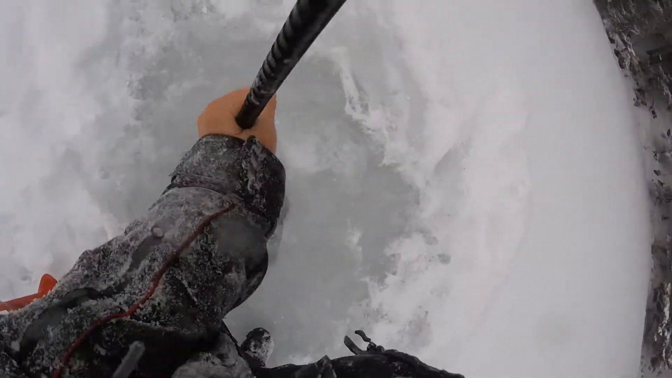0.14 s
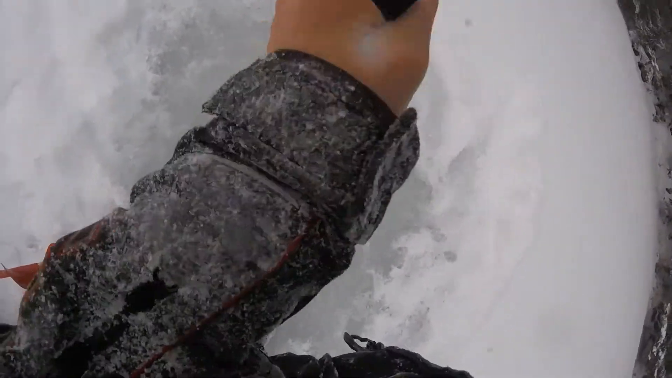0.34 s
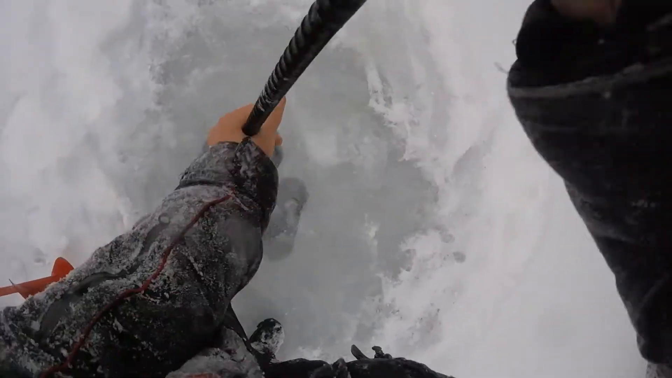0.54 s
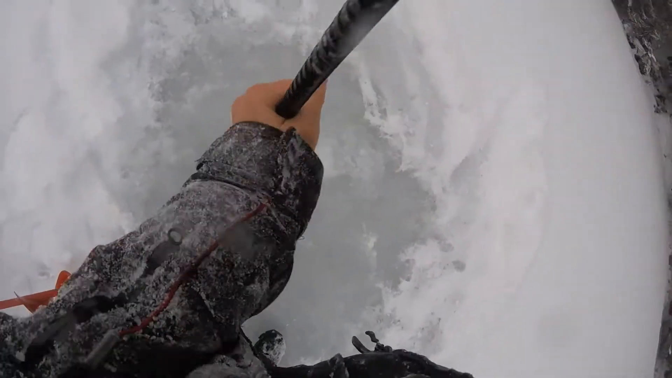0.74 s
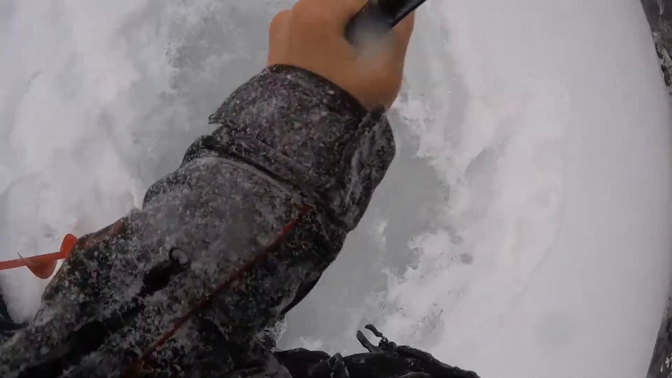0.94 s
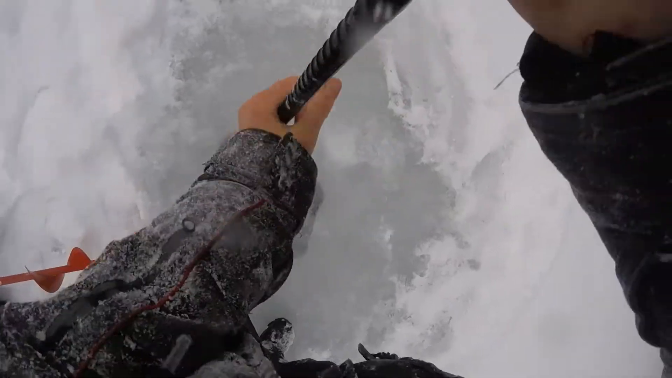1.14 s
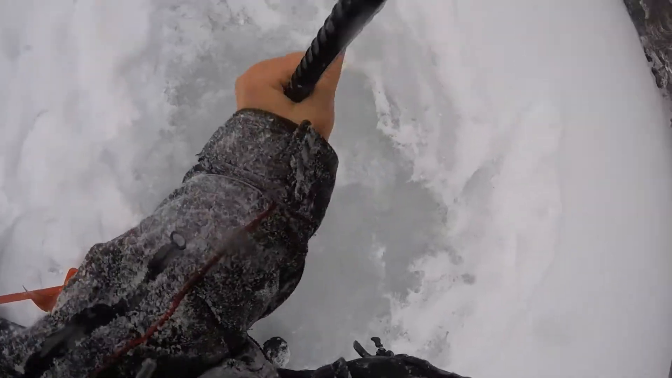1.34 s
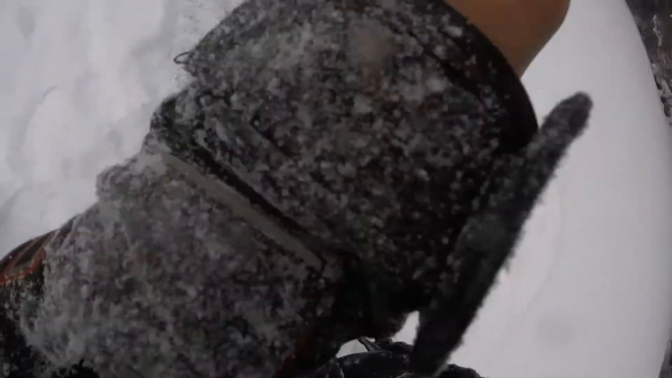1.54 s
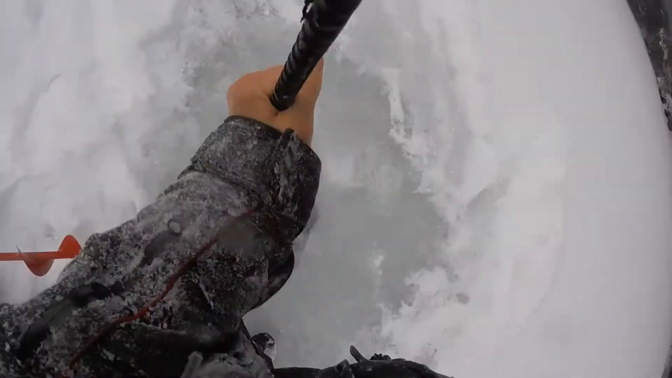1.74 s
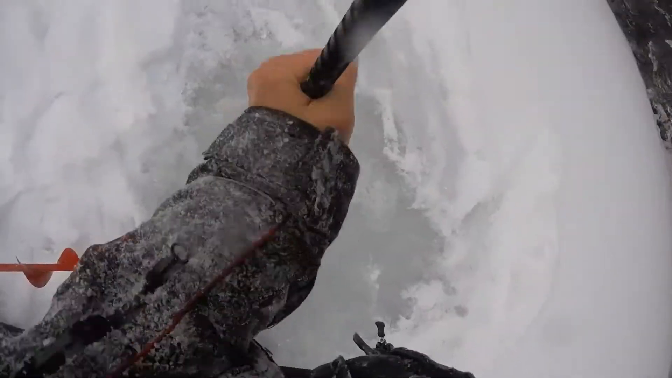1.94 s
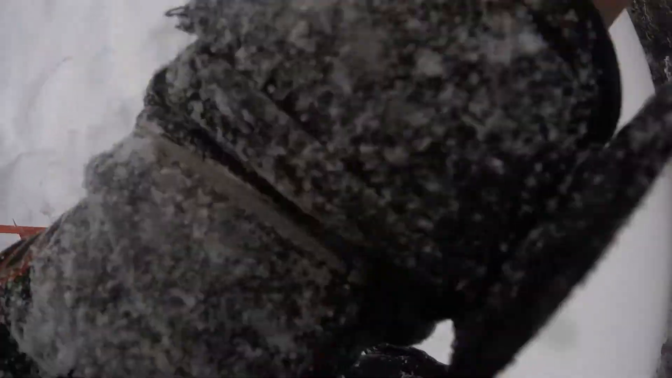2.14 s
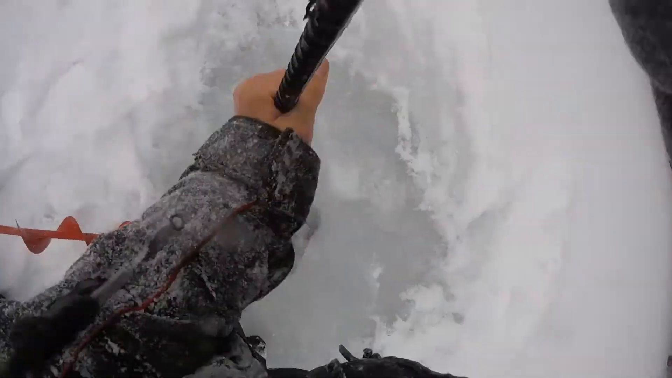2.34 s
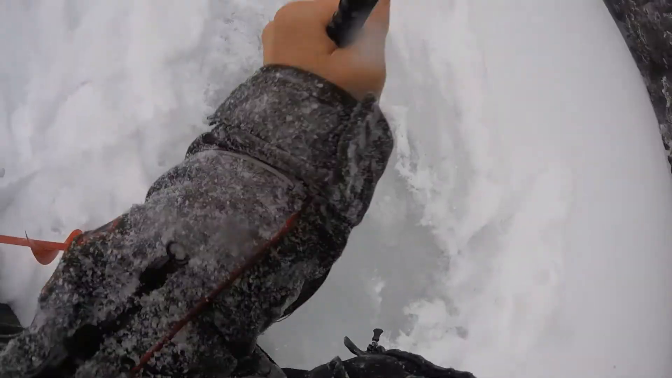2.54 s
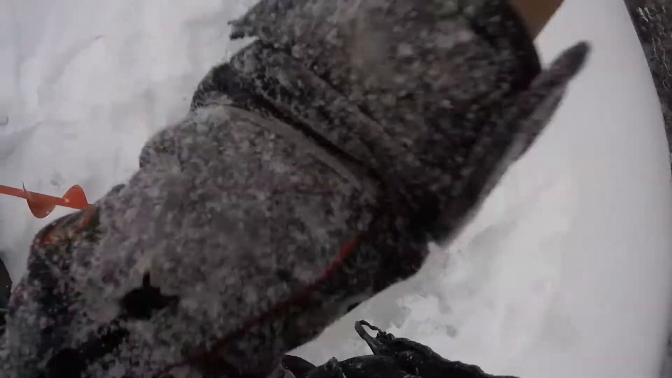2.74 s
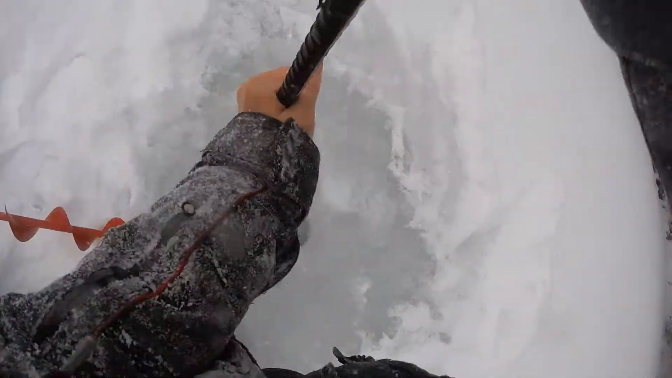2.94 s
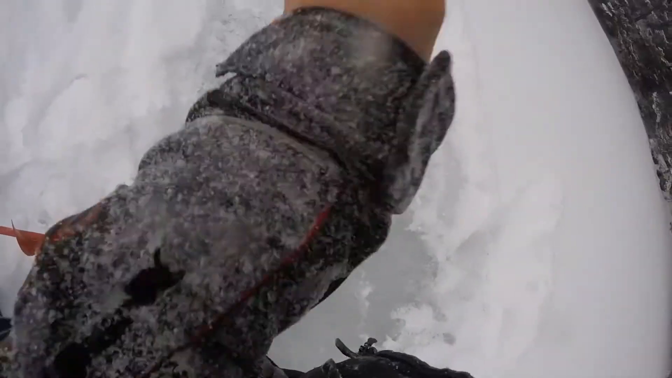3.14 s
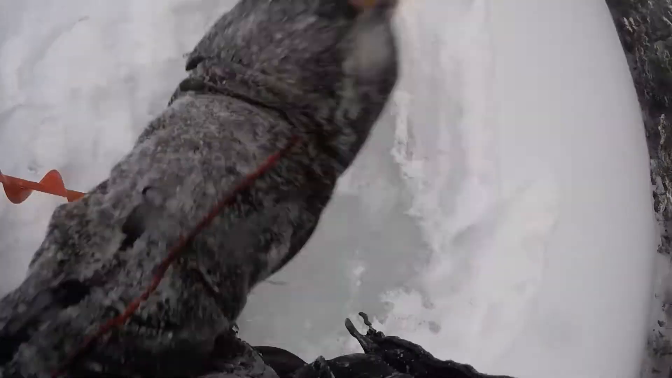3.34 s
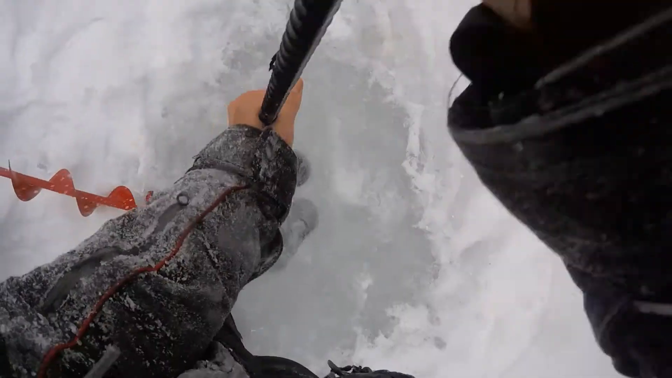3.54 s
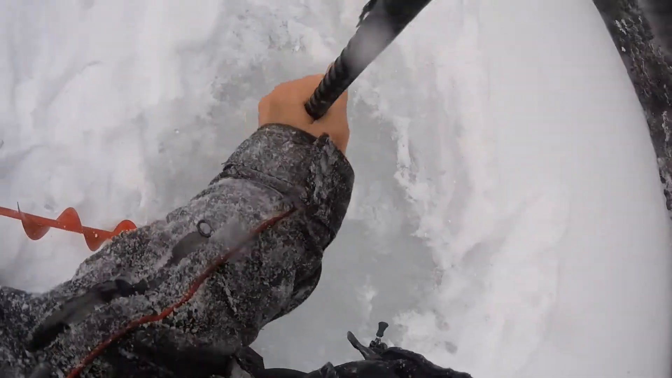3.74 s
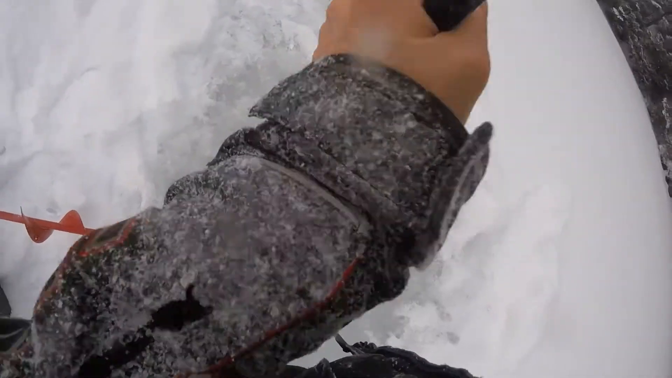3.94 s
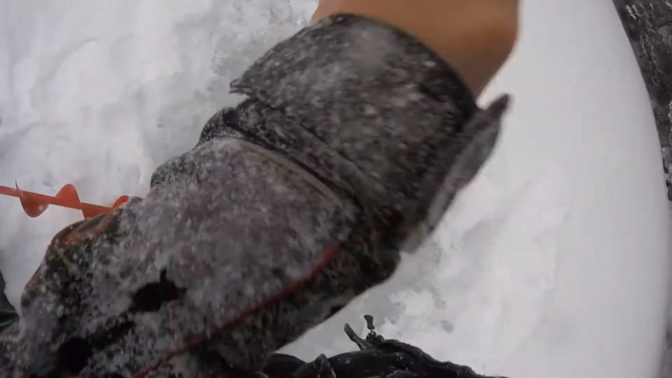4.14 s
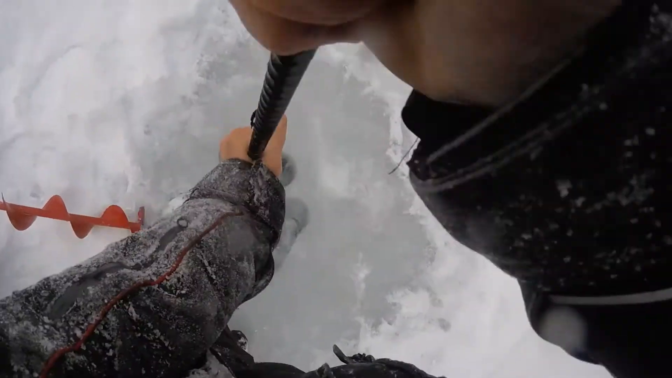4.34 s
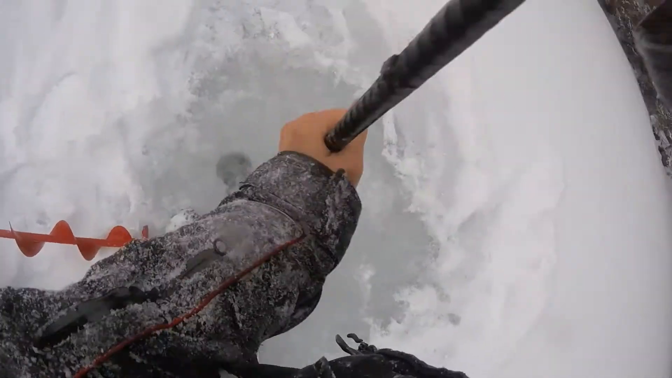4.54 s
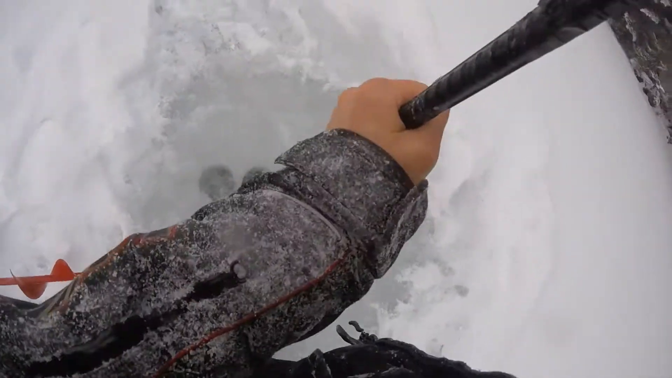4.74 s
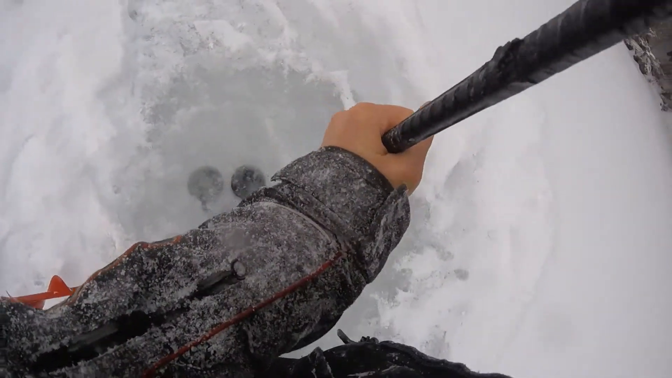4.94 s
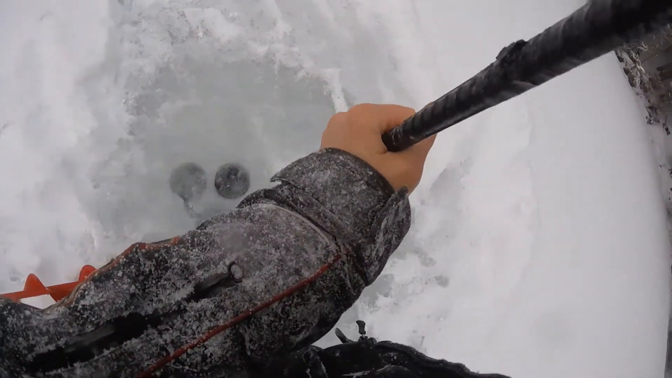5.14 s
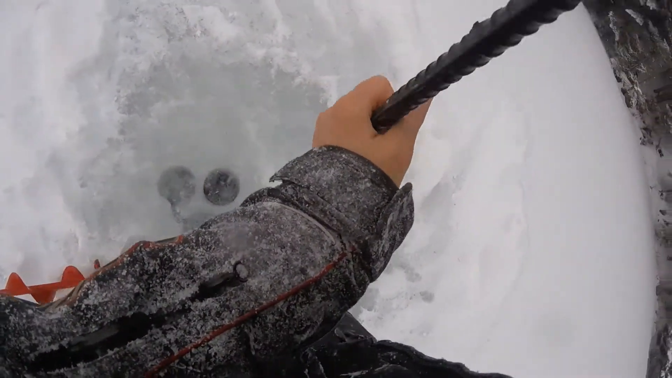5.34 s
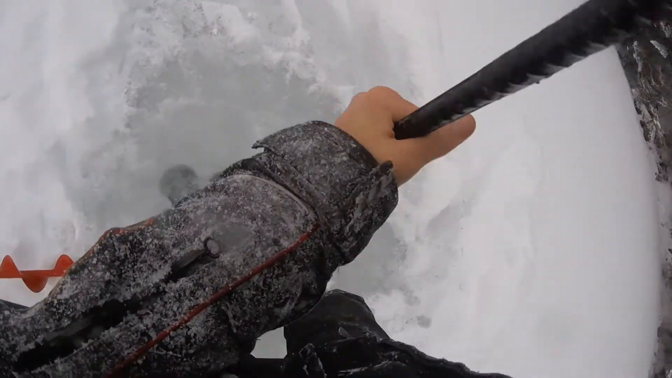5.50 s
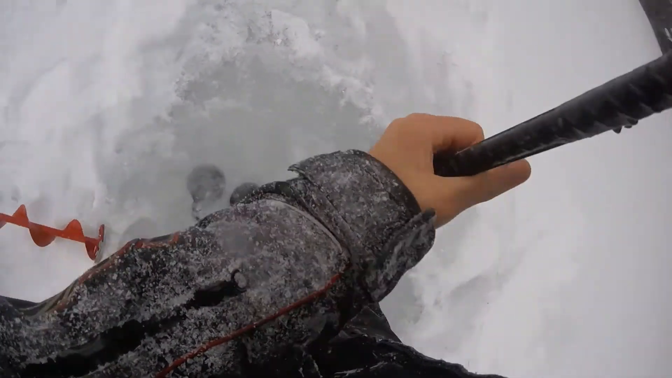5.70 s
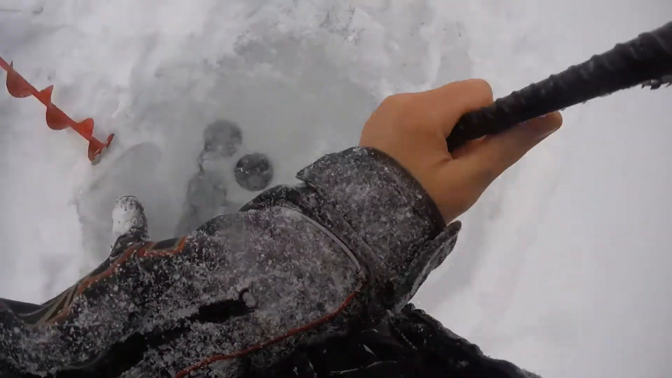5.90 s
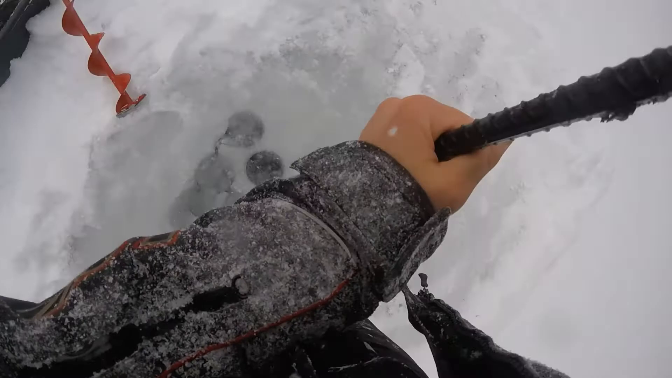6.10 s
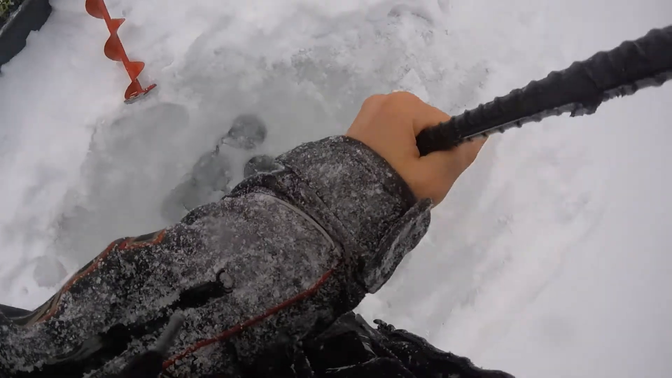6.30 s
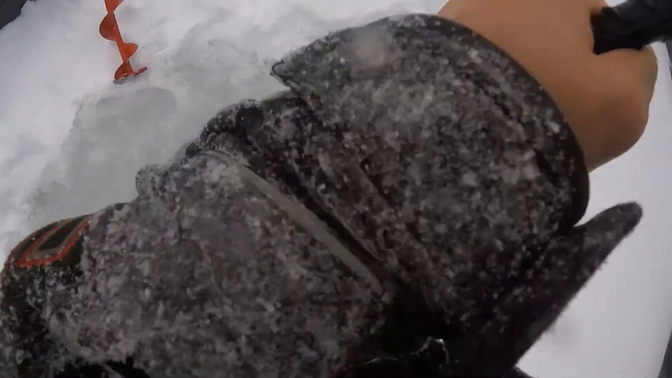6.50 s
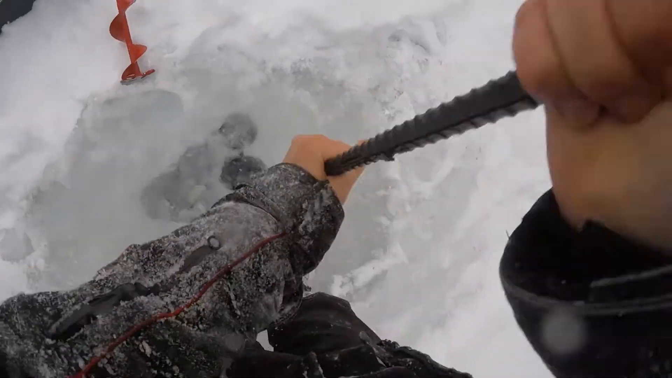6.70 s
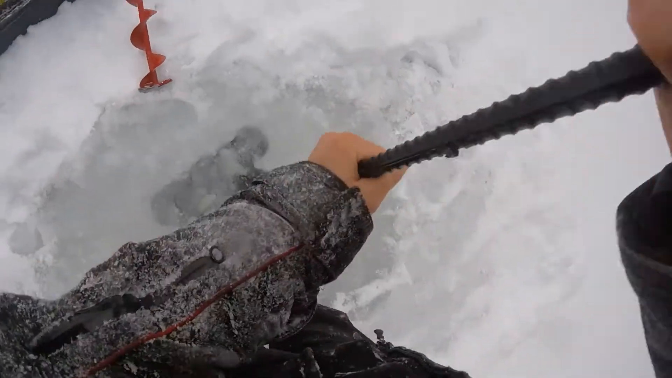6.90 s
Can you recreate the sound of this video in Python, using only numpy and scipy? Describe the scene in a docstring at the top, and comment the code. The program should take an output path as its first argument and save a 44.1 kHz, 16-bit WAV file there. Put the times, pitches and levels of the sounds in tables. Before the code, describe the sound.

Outdoors on ice, heard from a camera worn on the body: a steel bar strikes in steady rhythm, each blow a crunchy crack with short metallic ring, dull thud and plastic housing clack. A stiff jacket rubs and swishes between strokes and chips patter down. After eight strokes the chopping pauses for quiet cloth rustle and slushy scraping, then one more strong blow lands.

```python
"""Chopping a hole in lake ice with a steel chisel bar, heard from a camera worn on the chopper's body.
A breeze and a stiff jacket are there from the start, stirred up by every stroke: shaped noise.
The first blow crushes ice (bursts of clicks), rings the bar, thuds in the ice and clacks the camera housing (modes).
The blade squeals, pieces crack loose, the camera rocks, and chips land after it. Later come soft low knocks, shudders
of the mount with squeaks of its housing, faint tones at the bar's pitches, and the blade grinding in slush and grit."""
import sys
import numpy as np
from scipy import signal
from scipy.fft import rfft, irfft
from scipy.io import wavfile

SR = 44100
rng = np.random.default_rng(int(sys.argv[2]) if len(sys.argv) > 2 else 0)


def waveform_to_disk(signal):
    """Save audio, clipped to [-1, 1], as 16-bit WAV at the path in sys.argv[1]."""
    frames = np.transpose(np.atleast_2d(signal))
    scaled = np.clip(frames, -1, 1) * 32767
    samples = np.round(scaled).astype(np.int16)
    wavfile.write(sys.argv[1], SR, samples)


N = 306936
T = np.arange(N) / SR  # time in seconds


def amp(db):
    """Decibels to gain."""
    return 10 ** (np.asarray(db) / 20)


def unit(x):
    """Scale to rms 1."""
    return x / np.sqrt(np.mean(x ** 2))


def through(x, response):
    """Pass x through a body; white noise keeps its power."""
    return signal.fftconvolve(x, response / np.linalg.norm(response))[:N]


def colour(points, size=16384):
    """Causal impulse response whose spectrum follows (Hz, dB) points, built by folding its cepstrum."""
    hz, db = np.transpose(points)
    grid = np.maximum(np.fft.rfftfreq(size, 1 / SR), 1)
    spectrum = amp(np.interp(np.log(grid), np.log(hz), db))
    cepstrum = irfft(np.log(spectrum))
    cepstrum[1:size // 2] *= 2
    cepstrum[size // 2 + 1:] = 0
    return irfft(np.exp(rfft(cepstrum)))


def fade(t, t60):
    """Exponential decay that is 1 until t = 0, then falls 60 dB in t60 seconds."""
    return np.exp(-np.log(1000) * np.maximum(t, 0) / t60)


def ring(modes, damping=1, size=SR // 2):
    """Impulse response of (Hz, dB, t60) modes; damping shortens them all."""
    t = T[:size]
    return sum(amp(db) * fade(t, t60 / damping) * np.sin(2 * np.pi * hz * t) for hz, db, t60 in modes)


def free_ring(modes):
    """(Hz, dB, t60) modes left ringing by an uneven blow, each a little stronger or weaker by chance."""
    t = T[:SR // 2]
    out = 0
    for hz, db, t60 in modes:
        level = amp(db + 2 * rng.standard_normal())
        out = out + level * fade(t, t60) * np.sin(2 * np.pi * (hz * t + rng.random()))
    return out


def detuned(modes, spread):
    """(Hz, dB, t60) modes, each shifted a little by the grip and the contact of the moment."""
    return [(hz * (1 + spread * rng.standard_normal()), db, t60) for hz, db, t60 in modes]


def add(out, s, sound):
    """Mix a sound in at time s."""
    start = max(int(s * SR), 0)
    part = sound[:max(N - start, 0)]
    out[start:start + len(part)] += part


def grains(spread_db, size=N):
    """Dense micro-clicks of very unequal strength, rms 1."""
    strength = amp(spread_db * np.clip(rng.standard_normal(size), -2, 2))
    return unit(rng.standard_normal(size) * strength)


def walk(rate, size=N):
    """Random wandering through `rate` new values a second, with a spread near 1."""
    knots = rng.standard_normal(4096)
    return np.interp(T[:size] * rate, np.arange(len(knots)), knots)


def hump(s, half):
    """Speed of a movement that is fastest (1) at time s."""
    return np.exp(-((T - s) / half) ** 2)


def surge(s, build_s, fade_s):
    """Speed of a movement that builds up to 1 at time s and then dies away."""
    return np.exp(np.minimum((T - s) / build_s, (s - T) / fade_s))


# Full strokes of the arm; they also move the jacket, rock the camera and throw up small chips.
# Each row: time of the stop in seconds, camera jolt in dB, first swing in Hz, lift rubbing in dB,
# lift swish in dB, downstroke in dB, gust in dB. Levels are relative within each kind of sound.
STROKES = [(0.022, -6, 50, -35, -58, -42, -12), (0.55, -24, 38, -46, -49.5, -42.5, -27.5),
           (1.125, -9, 52, -51.5, -63.5, -46.5, -31), (1.791, -3, 49, -40, -52, -43.5, -22.5),
           (2.341, -2, 46, -42, -52, -37.5, -22.5), (2.916, -2.5, 56, -41.5, -49.5, -45, -23.5),
           (3.481, -5, 49, -40, -54, -41.5, -23.5), (4.313, -5, 17, -49, -56, -46, -18),
           (6.723, -4, 45, -40.5, -55, -46, -27.5)]
# Leans and grip shifts move the jacket; the row at 0.643 s is a rough burst as the mount shudders.
# Each row: middle in seconds, half-length in seconds, then rubbing, swish, folding and air in relative dB.
SHIFTS = [(0.278, 0.057, -47.5, -52, -47.5, -22), (0.834, 0.042, -69, -78, -59, -61),
          (2.577, 0.16, -55.5, -61, -61.5, -52), (3.117, 0.09, -55, -60.5, -54, -60),
          (0.643, 0.026, -34, -68, -59, -43), (1.396, 0.1, -55, -53, -50.5, -30),
          (3.544, 0.17, -41.5, -56, -44, -52), (4.104, 0.42, -49, -58.5, -51.5, -53),
          (4.504, 0.3, -51, -58.5, -52.5, -34.5), (4.847, 0.33, -57, -73, -61, -64),
          (5.037, 0.13, -68, -61, -46, -34), (5.45, 0.67, -60, -61.5, -50, -39.5),
          (5.887, 0.26, -50.5, -56, -50.5, -37.5), (6.275, 0.091, -49.5, -53.5, -37, -36),
          (6.833, 0.11, -42, -55, -44.5, -34)]
# Tone of the air on the microphone. Each row: frequency in Hz, relative level in dB per Hz.
BUFFET_TONE = [(5, 1.5), (14, 2), (28, -5), (55, -12), (100, -19.5), (200, -33.5), (600, -69)]
GUST_BUILD_S, GUST_FADE_S, BREEZE_DB = 0.14, 0.085, -46


def air():
    """Low buffeting: a gust around each stroke, a puff with each row of SHIFTS, a light breeze between."""
    gusts = sum((amp(db) * surge(s, GUST_BUILD_S, GUST_FADE_S)) ** 2 for s, *_, db in STROKES)
    puffs = sum((amp(db) * hump(s, half)) ** 2 for s, half, *_, db in SHIFTS)
    strength = np.sqrt(amp(BREEZE_DB) ** 2 + gusts + puffs)
    return strength * through(rng.standard_normal(N), colour(BUFFET_TONE))


# Tones of the cloth as it rubs, swishes and folds. Each row: frequency in Hz, relative level in dB per Hz.
RUB_TONE = [(200, -9.5), (550, -4), (900, 5), (1250, 5.5), (1700, -4.5), (2600, -4.5), (4000, -35),
            (9000, -50.5)]
SWISH_TONE = [(900, -3), (2000, -6), (3700, 3), (4600, -4), (6700, -2.5), (8300, -14.5), (11000, -9),
              (14000, -16.5), (16000, -58)]
FOLD_TONE = [(40, -22.5), (120, -10), (330, -6), (550, -11), (1000, -14), (3000, -71.5)]
# Cloth in the downstroke, added to the downstroke level of the stroke: rubbing, swish and folding in dB.
DOWN_CLOTH_DB = (2.5, -1.5, 5)
# Cloth at rest: rubbing, swish and folding in relative dB.
REST_CLOTH_DB = (-61.5, -67.5, -61)
# The lift is fastest this long before the stop; its folding is given relative to its rubbing.
LIFT_LEAD_S, LIFT_HALF_S, LIFT_FOLD_DB = 0.19, 0.087, -4
# The downstroke gathers speed until the stop, then the sleeve settles.
DOWN_BUILD_S, DOWN_FADE_S = 0.081, 0.0076


def jacket():
    """Stiff cloth rubs, swishes and folds with strokes and shifts, unevenly; the rough burst is made alike."""
    moves = [(hump(s, half), cloth_db) for s, half, *cloth_db, _ in SHIFTS]
    for s, _, _, rub_db, swish_db, down_db, _ in STROKES:
        lift_db = (rub_db, swish_db, rub_db + LIFT_FOLD_DB)
        moves.append((hump(s - LIFT_LEAD_S, LIFT_HALF_S), lift_db))
        moves.append((surge(s, DOWN_BUILD_S, DOWN_FADE_S), down_db + np.array(DOWN_CLOTH_DB)))
    catch_db = 1.74 * walk(55)  # shared by all three kinds of cloth sound
    out = 0
    for k, tone in enumerate((RUB_TONE, SWISH_TONE, FOLD_TONE)):
        moving_power = sum((amp(cloth_db[k]) * speed) ** 2 for speed, cloth_db in moves)
        power = amp(REST_CLOTH_DB[k]) ** 2 + moving_power
        threads = grains(spread_db=7) * np.sqrt(power) * amp(catch_db + 1.65 * walk(90))
        out = out + through(threads, colour(tone))
    return out


# Ringing modes of the steel bar. Each row: frequency in Hz, relative level in dB, undamped t60 in seconds,
# dB gained per dB of glancing, dB gained per dB of twisting.
BAR_MODES = [(648, -5.5, 0.14, 0, 0), (872, -8, 0.15, 0, .4), (1085, 2, 0.15, -.2, 0),
             (1640, -6, 0.092, 0, 0), (1975, -8, 0.15, -.2, 1), (2099, -14, .12, .3, .3),
             (2673, -11, .14, 0, .2), (3038, -12, .06, 0, 0), (3206, -8, .06, 0, 0),
             (3345, -15, .13, 0, .7), (3692, -3, .09, 0, 0), (3948, -10, .09, .3, .3),
             (3810, -20, .17, 0, .9), (4797, -15.5, 0.22, 1, 0), (5522, -16.5, 0.19, 0, 1),
             (6240, -13, .1, -.3, 0), (6550, -1, .125, -.2, -.3), (7580, -22, 0.17, 0, .7),
             (8495, -13, 0.15, -.5, 0), (9310, -23, 0.16, 0.3, 0), (10320, -12, 0.09, 0, 0),
             (11140, -15, 0.12, -.5, 0), (12030, -12, 0.125, -.4, 0), (14420, -18, 0.082, 0, 0)]


def bar(glance_db, twist_db, damping):
    """The bar's modes; a glancing or twisting contact wakes other ones, a tight grip or a stuck blade chokes them."""
    modes = []
    for hz, db, t60, glance, twist in BAR_MODES:
        modes.append((hz, db + glance * glance_db + twist * twist_db, t60 / damping))
    return detuned(modes, spread=.002)


# Relative levels of fractures heard through the wedged bar and straight from the ice; the bar's ring time.
CLANK_DB, DRY_CRUNCH_DB, CLANK_T60_S = -2, -3.5, 0.021


def clank(fractures):
    """Fractures are heard directly and through the bar, whose modes are brief while the blade is in the ice."""
    modes = [(hz, 0, CLANK_T60_S) for hz, *_ in BAR_MODES]
    wedged = ring(detuned(modes, spread=0.0077), size=SR // 16)
    through_bar = through(fractures, wedged)[:len(fractures)]
    return amp(DRY_CRUNCH_DB) * fractures + amp(CLANK_DB) * through_bar


# Blows of the blade. Each row: start in seconds, time to full bite in seconds, time until the blade stops
# in seconds, crunch in dB, crumbling t60 in seconds, bar ring in dB, glancing in dB, twisting in dB,
# bar damping factor, thud in dB, thud t60 in seconds, housing clack in dB, fine splintering in dB.
# Levels are relative within each kind of sound.
BLOWS = [ (0.002, 0.0043, 0.016, -11.5, 0.11, -31, -8, 0, 0.87, -11, 0.057, -17.5, -22.5),
         (0.541, 0.0018, 0.01, -12, 0.045, -19, 3, 0, 1, -10.5, 0.12, -18, -33),
         (1.111, 0.014, 0.015, -14, 0.073, -19, 4, 5.5, 1.43, -12.5, 0.061, -16.5, -22),
         (1.772, 0.002, 0.017, -18, 0.035, -34, 7, 0.5, 1.35, -10, 0.035, -15.5, -24),
         (2.321, 0.0018, 0.017, -14.5, 0.02, -36, 1.5, -3.5, 2.2, -16, 0.17, -22, -22.5),
         (2.896, 0.0057, 0.019, -18.5, 0.027, -31, -13, -11, 1.5, -10, 0.04, -23.5, -41),
         (3.461, 0.023, 0.016, -16.5, 0.12, -35, 1, -1, 1.2, -7.5, 0.019, -15.5, -45),
         (3.474, 0.00094, 0.0019, -18, .02, -36, 3, 17, 1.3, -9, .02, -10, -25),
         (4.301, 0.0016, 0.017, -12, 0.071, -27.5, 1, 21.5, 1.4, -18.5, 0.078, -20, -26),
         (4.326, 0.003, 0.0075, -30.5, 0.23, -33.5, 16, 15.5, 1, -20.5, 0.15, -33, -36.5),
         (5.734, 0.0015, 0.0098, -28.5, 0.065, -38.5, 17.5, -5.5, 0.82, -27.5, 0.11, -59, -39),
         (6.711, 0.0027, 0.006, -10, 0.11, -24, 12, 2, 1.9, -13.5, 0.17, -17, -31),
         (6.787, 0.017, 0.02, -30, 0.15, -36, -4, 4, 0.91, -42, .06, -52, -51), ]
# Tones of the crushed ice, the loose crumbs, the finest splintering at the blade's edge and the thud.
# Each row: frequency in Hz, relative level in dB per Hz.
CRUNCH_TONE = [(200, -25), (700, -2.5), (1100, 1), (1600, -8), (2400, -6.5), (3100, -18), (4000, -1.5),
               (6700, -1.5), (8500, -10.5), (12000, -15), (15000, -23.5)]
CRUMB_TONE = [(500, -15), (2000, -14.5), (3700, -2.5), (6500, -4.5), (9000, -16), (15000, -5.5)]
SPLINTER_TONE = [(3000, -23.5), (7000, -17.5), (9000, -8), (11500, 1), (14500, -0.5), (16000, -12.5)]
THUD_TONE = [(40, -19), (90, 3.5), (160, 3.5), (230, 1), (310, 0.5), (550, -11.5), (850, -16.5), (1130, -3),
             (1500, -20.5), (3000, -22), (9000, -42.5)]
# Low modes of the ice around the hole. Each row: frequency in Hz, relative level in dB, t60 in seconds.
ICE_MODES = [(170, -15, 0.089), (283, -1, 0.16), (321.6, -3, 0.22), (430.6, -0.5, 0.09), (820, -10, 0.056),
             (884, 5, 0.072), (1153, -4.5, 0.066)]
# Modes of the plastic housing, also used by the shudders.
# Each row: frequency in Hz, relative level in dB, undamped t60 in seconds.
HOUSING_MODES = [(630, 6, 0.091), (1087, 4.5, 0.18), (1150, 5, 0.15), (1933, 2, 0.099), (2234, 14, 0.11),
                 (2347, 11.5, 0.082), (2480, 8, 0.14), (2556, 9, 0.069), (2704, 5.5, 0.1),
                 (3660, 6.5, 0.062)]


def chops():
    """The blade crushes ice until it stops; the blow rings the bar, thuds in the ice and clacks the housing."""
    crush, crumbs, splinters, steel, sheet, case = np.zeros((6, N))
    t = T[:SR // 2]
    for (s, rise, stop, crunch_db, crumble_t60, ring_db, glance_db, twist_db, damping,
         thud_db, thud_t60, clack_db, splinter_db) in BLOWS:
        bite = np.minimum(t / rise, 1)
        # the load on the blade builds up until the ice holds it
        load = np.minimum(t / stop, 1)
        # the ice gives way in uneven steps, each a burst of fine fractures
        steps = unit(amp(4.0 * walk(446, size=len(t))))
        fractures = amp(crunch_db) * steps * grains(spread_db=5.5, size=len(t)) * bite
        add(crush, s, 0.38 * clank(fractures * fade(t - stop, 0.0028)))
        slivers = grains(spread_db=9.5, size=len(t)) * bite * fade(t - stop / 2, 0.01)
        add(splinters, s, amp(splinter_db) * clank(slivers))
        # loose crumbs go on settling after the stop
        add(crumbs, s, 0.16 * clank(fractures * fade(t - stop, crumble_t60)))
        add(steel, s, amp(ring_db + 2.0) * load * free_ring(bar(glance_db, twist_db, damping)))
        # a short thud with a weak, longer tail
        settling = fade(t - stop, thud_t60) + 0.099 * fade(t - stop, 0.37)
        add(sheet, s, amp(thud_db) * grains(spread_db=4.5, size=len(t)) * load ** 1.02 * settling)
        rattle = steps * rng.standard_normal(len(t)) * bite * fade(t - stop, 0.026)
        housing = ring(detuned(HOUSING_MODES, spread=.014), damping=6.1)
        add(case, s, amp(clack_db) * through(rattle, housing))
    thud = amp(-4.0) * through(sheet, colour(THUD_TONE)) + amp(-11.5) * through(sheet, ring(ICE_MODES))
    crunch = through(crush, colour(CRUNCH_TONE))
    crunch += through(crumbs, colour(CRUMB_TONE)) + through(splinters, colour(SPLINTER_TONE))
    return crunch + steel + thud + case


# Squeals of the blade in the cut, and thin squeaks of the camera housing as it buzzes and rubs
# (the rows at 0.601, 1.379 and 1.399 s).
# Each row: start in seconds, length before the fade in seconds, middle pitch in Hz, relative level in dB.
SQUEALS = [(0.006, 0.017, 2603, -15), (0.548, 0.021, 2643, -12.5), (0.601, 0.054, 2440, -31),
           (1.119, 0.014, 2510, -14), (1.379, .05, 2328, -38.5), (1.399, 0.018, 3660, -38),
           (1.776, 0.019, 2558, -21.5), (2.323, 0.016, 2466, -12.5), (2.905, 0.0084, 2286, -17),
           (3.474, 0.016, 1963, -27), (4.308, 0.013, 2120, -23.5)]


def squeals():
    """Squeals of the blade and squeaks of the housing: brief tones, unsteady in pitch and strength."""
    out, t = np.zeros(N), T[:SR // 8]
    for s, length, hz, db in SQUEALS:
        pitch = hz * (1 + 0.021 * walk(370, size=len(t)))
        swell = np.minimum(t / 0.0066, 1) * fade(t - length, 0.031)
        unsteady = swell * amp(2.2 * walk(350, size=len(t)))
        add(out, s, amp(db) * unsteady * np.sin(2 * np.pi * np.cumsum(pitch) / SR))
    return out


# Pieces of ice breaking loose under the blade.
# Each row: start in seconds, relative level in dB, pitch in Hz, t60 of the main mode in seconds.
CRACKS = [(0.012, -2.5, 1097, .07), (0.018, -19, 160, 0.043), (0.554, -6.5, 198, 0.087),
          (1.124, -2.5, 317, 0.044), (1.776, -8.5, 920, 0.039), (2.327, -15.5, 330, .08),
          (2.914, -0.5, 163, 0.054), (3.475, -15, 1700, 0.045), (4.300, -10, 1120, 0.016),
          (4.306, -9, 1230, 0.033), (4.313, -9, 2255, .045), (4.326, -8, 1085, 0.053),
          (4.329, -11.5, 303, 0.036), (4.349, -14.5, 916, 0.078), (4.35, -28.5, 3330, 0.06),
          (5.737, -31, 2730, 0.043), (6.716, -2.5, 322, 0.047), (6.716, -12, 1610, 0.058),
          (6.729, -18, 1125, 0.048), (6.785, -20, 876, 0.069), (6.8, -15.5, 1385, 0.048),
          (6.807, -35, 3340, 0.1)]


def cracks():
    """A piece that breaks loose knocks with a cluster of close modes around its own pitch."""
    out, t = np.zeros(N), T[:SR // 2]
    for s, db, hz, t60 in CRACKS:
        piece = free_ring([(hz, 0, t60), (hz * .86, -5, t60 * 0.47), (hz * 1.13, -5, t60 * 0.52)])
        onset = 1 - np.exp(-t * hz)
        add(out, s, amp(db - 2.0) * onset * piece)
    return out


def jolts():
    """Each stop in STROKES rocks the camera: one quick swing, then slower ones that die out."""
    out, t = np.zeros(N), T[:SR // 2]
    for s, db, hz, *_ in STROKES:
        swing_hz = 14 + (hz - 14) * np.exp(-t / 0.027)  # glides to 14 Hz
        add(out, s, -amp(db) * 1.26 * fade(t, 0.19) * np.sin(2 * np.pi * np.cumsum(swing_hz) / SR))
    return out


# Shortest and longest flight of a small chip, and how a typical one lands (levels are relative).
SHORTEST_FLIGHT_S, LONGEST_FLIGHT_S = 0.02, 0.32
SMALL_DB, SMALL_SPREAD_DB, SMALL_HZ, SMALL_T60_S, SMALL_TICK_DB = -36, 2, 1300, 0.025, -60


def small_chips(count):
    """Each stroke throws up `count` small chips that land at random; rows like those of CHIPS."""
    rows = []
    for s, *_ in STROKES:
        for flight, size, pitch in rng.random((count, 3)):
            db = SMALL_SPREAD_DB * (2 * size - 1)
            lands = s + SHORTEST_FLIGHT_S + flight * (LONGEST_FLIGHT_S - SHORTEST_FLIGHT_S)
            hz = SMALL_HZ * 2 ** (pitch - .5)
            rows.append((lands, SMALL_DB + db, hz, SMALL_T60_S, SMALL_TICK_DB + db))
    return rows


# The larger chips and lumps of slush landing. Each row: landing time in seconds, relative peak in dB,
# pitch in Hz, t60 of the tumbling in seconds, relative level of the sharp tick in dB.
CHIPS = [(0.061, -15, 1000, 0.056, -40), (0.08, -23, 1370, 0.048, -37.5), (0.675, -28.5, 627, 0.049, -57),
         (1.026, -30, 1400, 0.028, -54), (1.843, -30, 1700, 0.028, -52), (1.169, -13, 1050, 0.072, -56),
         (1.212, -31.5, 1510, 0.024, -61), (1.429, -17.5, 2190, 0.0097, -36),
         (1.882, -23.5, 1540, 0.02, -64), (2.372, -15, 910, 0.029, -33), (2.389, -18.5, 1520, 0.038, -39.5),
         (2.426, -17.5, 1500, 0.023, -65), (2.578, -27, 950, 0.016, -54), (2.885, -18, 910, 0.0079, -62),
         (2.973, -26.5, 1600, 0.018, -61), (3.006, -19, 1500, 0.026, -62), (3.142, -21, 1190, 0.02, -64),
         (3.301, -18, 1000, 0.048, -48), (3.393, -23, 1540, 0.019, -53), (3.648, -22.5, 1180, 0.055, -57),
         (4, -24, 790, 0.065, -49), (4.403, -21.5, 1530, 0.04, -54), (4.491, -34, 1670, .025, -56),
         (4.881, -26.5, 1220, 0.058, -62), (5.808, -22, 1100, 0.045, -60), (5.917, -27, 1250, .02, -59),
         (6.038, -23.5, 1200, 0.054, -45), (6.8, -9.5, 1280, 0.05, -41), (6.831, -23, 1260, 0.017, -43),
         (6.847, -30, 1250, 0.016, -52)]
# Tone of the tick. Each row: frequency in Hz, relative level in dB per Hz.
LANDING_TONE = [(500, -12), (2000, 8), (3700, -4), (6500, -9), (9000, -10), (15000, -30)]


def chips():
    """A chip lands with a sharp tick and a short, wet knock at its own pitch."""
    knocks, ticks, t = np.zeros(N), np.zeros(N), T[:SR // 8]
    for s, db, hz, t60, tick_db in CHIPS + small_chips(count=2):
        contact = rng.standard_normal(len(t))
        body = ring([(hz, 0, min(t60, .014)), (hz * 0.61, -7, .008), (hz * 1.114, -7, .008)], size=SR // 50)
        tumble = contact * fade(t, t60)
        landing = 0.79 * np.linalg.norm(tumble) * (t == 0)  # a single click
        knock = signal.fftconvolve(landing + tumble, body)
        add(knocks, s, amp(db - 2.0) * knock / np.abs(knock).max())
        add(ticks, s, amp(tick_db + 7.5) * contact * fade(t, 0.022))
    return knocks + through(ticks, colour(LANDING_TONE))


# Soft low knocks of clothing on the camera, and a boot creaking in snow near 4.97 s.
# Each row: start in seconds, relative level in dB, pitch in Hz, t60 in seconds.
LOW_KNOCKS = [(0.3205, -18.5, 470, 0.0063), (1.423, -2.5, 148, 0.0064), (2.371, -4, 277, 0.0066),
              (3.851, -28.5, 138, 0.028), (4.846, -28.5, 260, 0.011), (4.962, -39, 288, 0.077),
              (4.979, -35, 304, 0.048), (5.033, -35, 326, .025), (5.105, -31, 240, 0.015),
              (5.344, -36, 328, 0.022), (5.741, -23.5, 249, 0.055), (5.912, -33.5, 426, 0.023),
              (6.228, -30, 425, .02), (6.328, -30, 221, 0.037)]


def low_knocks():
    """Dull knocks of cloth and the creak of a boot: low tones that die away quickly."""
    out, t = np.zeros(N), T[:SR // 8]
    for s, db, hz, t60 in LOW_KNOCKS:
        add(out, s, -1.5 * amp(db) * fade(t, t60) * np.sin(2 * np.pi * hz * t))
    return out


# The camera mount shudders. Each row: start in seconds, length in seconds, shakes per second,
# then sway, buzz and housing ring in relative dB.
SHUDDERS = [(0.556, 0.037, 59, -18, -18, -23.5), (0.583, 0.087, 75, -19.5, -31, -34),
            (1.377, 0.058, 91, -48.5, -43, -56)]


def shudders():
    """The mount sways; the loose housing rings out and buzzes against it once a cycle."""
    sway, buzz, rings = np.zeros((3, N))
    t = T[:SR // 2]
    for s, length, hz, sway_db, buzz_db, ring_db in SHUDDERS:
        attack = np.minimum(t / 0.0036, 1)
        swell = attack * np.clip(1 - t / length, 0, 1) ** 0.5
        cycle = np.sin(2 * np.pi * hz * t)
        add(sway, s, -amp(sway_db) * swell * cycle)
        pulses = unit(amp(4.8 * cycle))  # strongest once a cycle
        add(buzz, s, amp(buzz_db) * swell * pulses * grains(spread_db=17.0, size=len(t)))
        add(rings, s, amp(ring_db) * attack * fade(t, 0.35) * free_ring(HOUSING_MODES))
    return sway + rings + through(buzz, ring(HOUSING_MODES, damping=1.8))


# Faint, thin steady tones at the bar's pitches, swelling and dying away. Each row: middle in seconds,
# half-length in seconds, relative level in dB, then the glancing and twisting dB that weight the modes.
BAR_TONES = [(1.407, 0.011, -47, -2, 8), (3.29, 0.12, -57, 3, 8.5), (3.647, 0.13, -56, 8, 13),
             (4.465, .1, -58, 6, 4), (6.545, 0.036, -60, 9, 3), (6.832, 0.037, -51.5, -2, 9)]


def bar_tones():
    """Faint, thin tones at the bar's pitches: swelling noise passed through its modes above 1500 Hz."""
    out = np.zeros(N)
    for s, half, db, glance_db, twist_db in BAR_TONES:
        noise = hump(s, half) * grains(spread_db=7.5) * amp(3.3 * walk(70))
        swell = noise[:int((s + 3 * half) * SR)]
        start = max(s - 3 * half, 0)
        high_modes = [mode for mode in bar(glance_db, twist_db, damping=1.0) if mode[0] > 1500]
        add(out, start, amp(db) * through(swell[int(start * SR):], ring(high_modes)))
    return out


def granules(per_s, cycles, count):
    """Separate ice grains snapping: count sizes, each with its own pitch and per_s snaps a second; rms 1."""
    out = 0
    for hz in np.geomspace(250, 12000, count):
        snaps = np.zeros(N)
        when, size = rng.random((2048, 2))[:int(per_s * N / SR)].T
        snaps[(when * (N - 1)).astype(int)] = amp(8.9 * size)
        grain = ring([(hz, 0, cycles / hz)], size=SR // 20)
        out = out + np.sqrt(hz) * through(snaps, grain)
    return unit(out)


# The blade grinds through loose slush. Each row: start in seconds, swell in seconds, t60 in seconds,
# slush in relative dB, grit in relative dB.
SCRAPES = [(4.345, 0.015, 0.16, -26.5, -33.5), (5.020, 0.037, 0.25, -41, -50.5),
           (5.801, 0.0074, 0.32, -34, -44), (5.909, 0.0062, 0.12, -39, -47),
           (5.978, 0.032, 0.26, -40.5, -43.5), (6.212, 0.033, 0.18, -32.5, -35),
           (6.45, .125, 0.19, -44, -46.5), (6.762, 0.047, 0.25, -30.5, -44)]
# Tones of the wet slush and of the brittle grains. Each row: frequency in Hz, relative level in dB per Hz.
SLUSH_TONE = [(100, 0.5), (300, 7), (600, -1.5), (850, 7.5), (1350, 8.5), (1750, 0.5), (2500, -32),
              (3800, -9.5), (4600, -47), (7000, -27), (14000, -28)]
GRIT_TONE = [(500, -16), (1500, 20), (2400, 1.5), (3700, 4.5), (4600, -9), (7000, -14), (14000, -37)]


def scrapes():
    """Wet slush gives way in uneven steps, and coarse, brittle grains snap in it."""
    wet, dry = np.zeros((2, N))
    t = T[:SR // 2]
    for s, swell, t60, slush_db, grit_db in SCRAPES:
        push = np.minimum(t / swell, 1) * fade(t - swell, t60)
        add(wet, s, amp(slush_db) * push)
        add(dry, s, amp(grit_db) * push)
    coarse = granules(per_s=60, cycles=14, count=16)
    steps = unit(amp(2.3 * walk(110)))
    crumbs = steps * unit(coarse + 0.64 * grains(spread_db=9.0))
    return through(wet * crumbs, colour(SLUSH_TONE)) + through(dry * crumbs, colour(GRIT_TONE))


def scene():
    """Open ice gives no echo: all is close and dry."""
    sound = air() + jacket() + chops() + squeals() + cracks() + jolts()
    sound += chips() + low_knocks() + shudders() + bar_tones() + scrapes()
    return sound[None]


TOP_HZ = 15500


def record(dry):
    """The camera blocks steady pressure, rounds the highest peaks and cuts the top."""
    moving = signal.sosfilt(signal.butter(1, 3, "highpass", fs=SR, output="sos"), dry)
    rounded = moving / (1 + moving ** 6) ** (1 / 6)
    return signal.sosfilt(signal.ellip(8, .2, 70, TOP_HZ, fs=SR, output="sos"), rounded)


dry = scene()
out = record(dry)
waveform_to_disk(out)
```